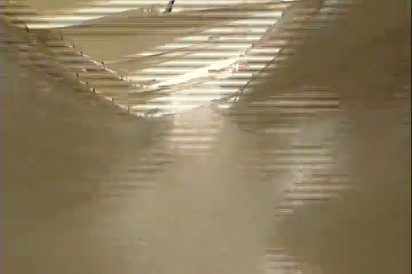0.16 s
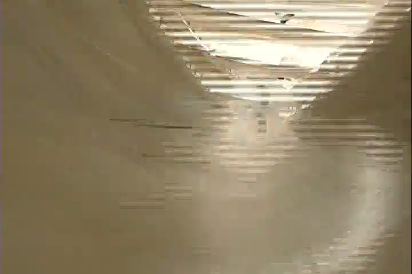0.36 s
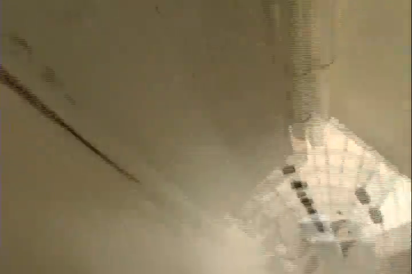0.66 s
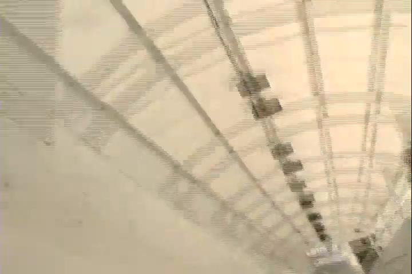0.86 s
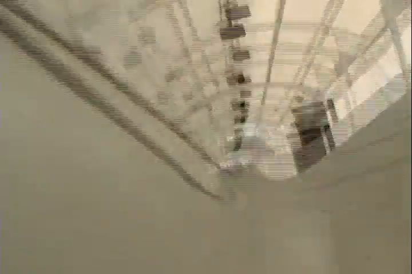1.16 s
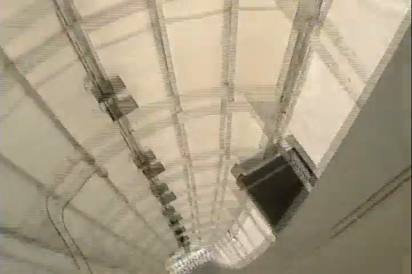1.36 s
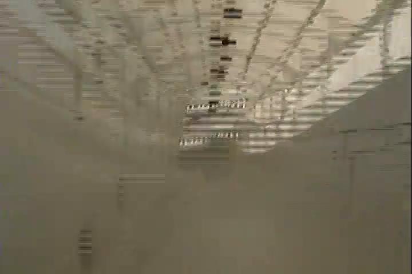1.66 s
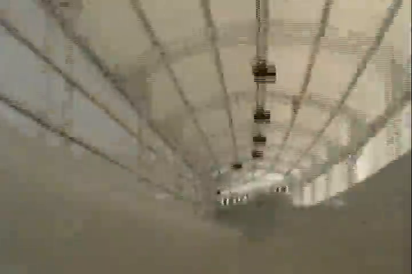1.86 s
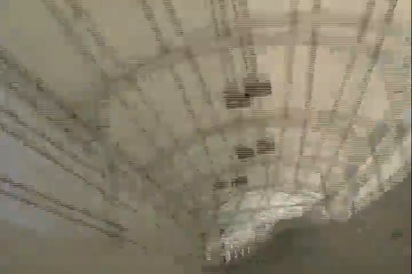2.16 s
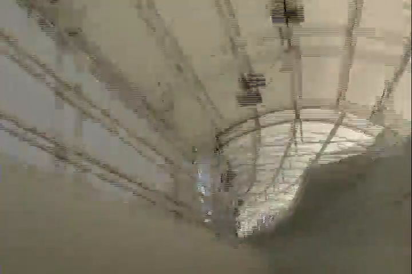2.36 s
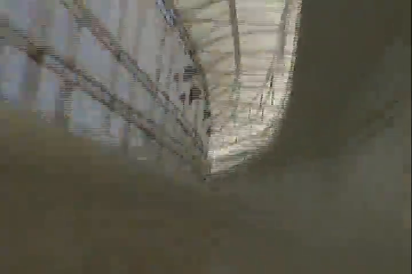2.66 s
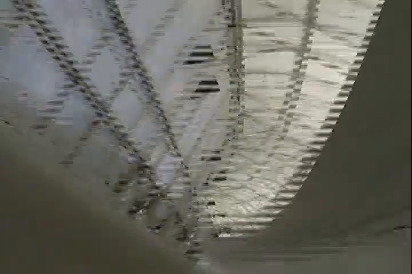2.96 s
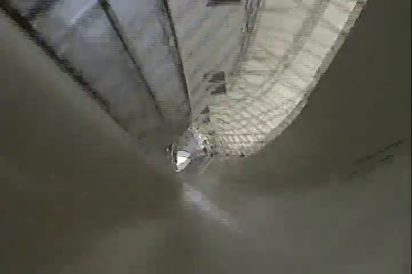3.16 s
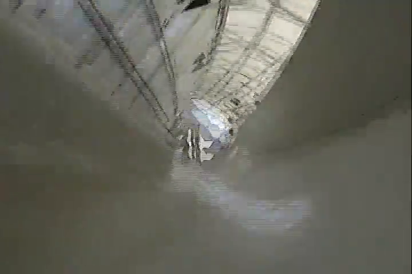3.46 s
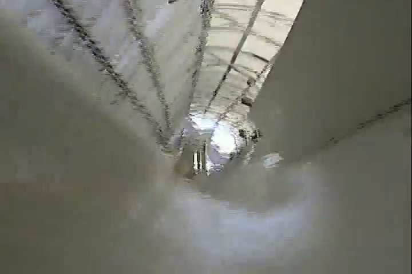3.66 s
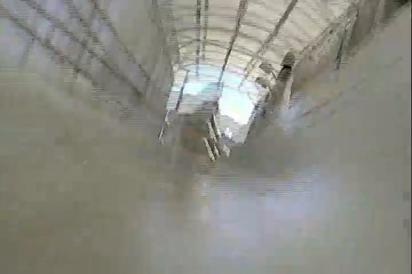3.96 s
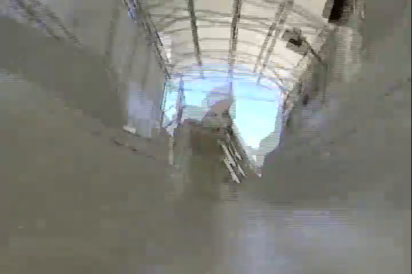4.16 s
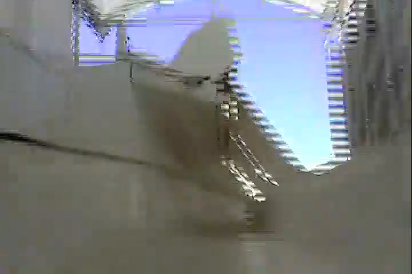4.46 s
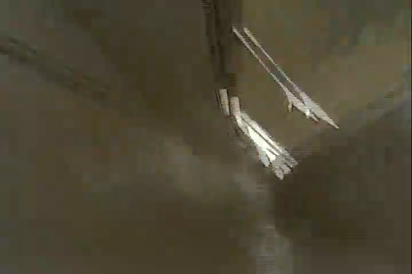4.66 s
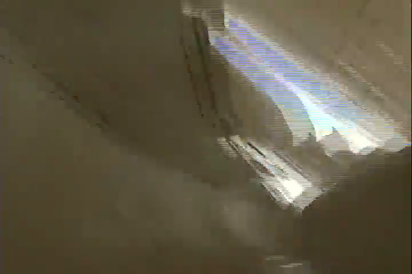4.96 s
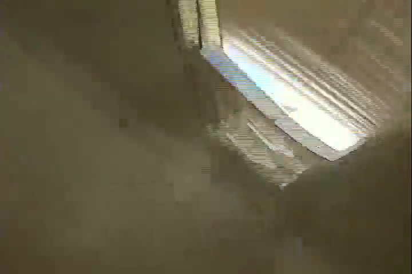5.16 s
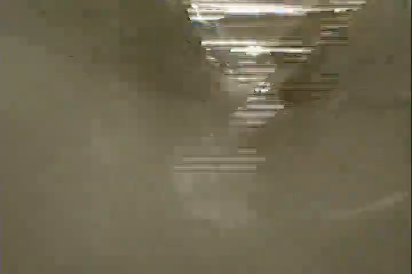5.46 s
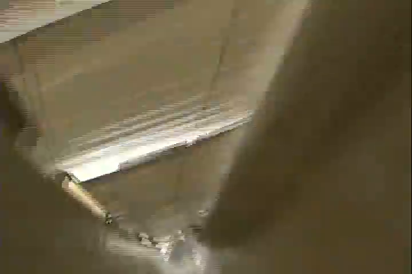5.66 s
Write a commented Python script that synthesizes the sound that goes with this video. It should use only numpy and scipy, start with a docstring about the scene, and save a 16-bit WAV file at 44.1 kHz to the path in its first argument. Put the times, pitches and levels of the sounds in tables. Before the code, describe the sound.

A sled races down a covered ice track for about six seconds, heard close and dry from a microphone on board. Throughout, steel runners roar and hiss, the shell drums with a low rumble, and gusts of wind buffet the microphone. Small crunches of chipped ice are scattered along the way. The runners skid at about 0.8 seconds, followed by a thump near 1 second. From 1.2 to 1.4 seconds the sled grinds along the wall with a growl, a steely ring and a spray of ice. Between 2 and 3.3 seconds the rumble grows heavier, with quick skids and hard, rattling bumps, strongest around 2.3, 2.6 and 2.8 seconds. More skids come between 3.6 and 4.6 seconds, with jolts near 4, 4.6 and 4.8 seconds. A last thump at 5.5 seconds is followed by brief icy crunches as the ride continues. The loudest peaks distort slightly.

```python
"""A sled races down a covered ice track, heard close and dry from a camera microphone on board.
Ripples and bumps in the ice drum on its shell, harder under load in the bends. Just below, steel
runners roar, hiss and skid, chipping the ice here and there, and once the sled grinds along the wall.
Wind buffets the microphone, and the loudest moments overload the input stage."""
import sys
import numpy as np
from scipy import signal
from scipy.fft import rfft, irfft
from scipy.io import wavfile

SR = 44100
rng = np.random.default_rng(int(sys.argv[2]) if len(sys.argv) > 2 else 0)


def generate_wav(signal):
    """Clip the signal to [-1, 1] and save it as 16-bit WAV at the path in sys.argv[1]."""
    frames = np.transpose(np.atleast_2d(signal))
    scaled = np.clip(frames, -1, 1) * 32767
    pcm = np.round(scaled).astype(np.int16)
    wavfile.write(sys.argv[1], SR, pcm)


N = 256650
T = np.arange(N) / SR
FREQS = np.maximum(np.fft.rfftfreq(N, 1 / SR), 1)


def undb(db):
    """Decibels to gain."""
    return 10 ** (np.asarray(db) / 20)


def unit(x):
    """Scale to rms 1."""
    return x / np.sqrt(np.mean(x ** 2))


def curve(rows):
    """(time, value) points joined by straight lines."""
    return np.interp(T, *np.transpose(rows))


def across(points):
    """(frequency, value) points joined on a log-frequency axis."""
    hz, value = np.transpose(points)
    return np.interp(np.log(FREQS), np.log(hz), value)


def spectrum(points):
    """Gain at every frequency from (frequency [Hz], level [dB]) points."""
    return undb(across(points))


def resonances(modes):
    """Response of damped modes; neighbours swing in opposite senses."""
    return sum((-1) ** k * undb(db) / (1 + 1j * (FREQS ** 2 - hz ** 2) / (FREQS * width))
               for k, (hz, width, db) in enumerate(modes))


def colour(x, response):
    """Filter a signal and bring it to rms 1."""
    return unit(irfft(rfft(x) * response, N))


def wander(rate):
    """Smooth random drift of rms 1 that changes about rate times a second."""
    return colour(rng.standard_normal(N), np.exp(-(FREQS / rate) ** 2))


def grains(rate, spread_db):
    """Two unrelated streams of tiny, uneven impacts, each about rate a second."""
    struck = rng.random((2, N)) < rate / SR
    size = undb(spread_db * np.minimum(rng.exponential(size=(2, N)), 5))
    return unit(struck * size * rng.choice([-1, 1], (2, N)))


def swell(start, length):
    """A push that peaks at half its length and dies away."""
    age = np.maximum(T - start, 0) / length
    return 2 * age * np.exp(1 - 2 * age)


def arch(start, length):
    """A push that builds and eases off evenly."""
    return np.sin(np.pi * np.clip((T - start) / length, 0, 1))


# side minus mid; long waves reach both ports alike: (frequency [Hz], level [dB])
MIC_WIDTH = [(25, -20), (60, -24), (130, -21), (220, -15), (500, -11.5), (900, -9.5), (1400, -6.5),
             (1900, -2.5), (2700, -3.5), (3600, -5), (4100, -1), (5000, -2), (6200, -3), (8000, -.5)]
# lag of the left port as sound bends round the camera: (frequency [Hz], phase [rad])
LEFT_LAG = [(60, 0), (300, .13), (1600, .12), (2100, 1.1), (2700, 2.1), (3100, 2), (3600, 3.1), (4400, .5),
            (5300, .2), (5700, -2.1), (7000, -2.3)]

def microphone(pair, response, width=spectrum(MIC_WIDTH), lean=1):
    """Two unrelated signals become the common and the differing part at the microphone's two ports."""
    mid, side = pair
    side = irfft(rfft(side) * width, N)
    left = np.sqrt(lean) * np.exp(-.5j * across(LEFT_LAG))
    port_responses = response * np.array([left, 1 / left]) / np.sqrt(1 + width ** 2)
    return colour(np.array([mid + side, mid - side]), port_responses)


# wind right on the microphone: (frequency [Hz], relative level [dB])
WIND_SPECTRUM = [(12, 5), (25, 4.5), (60, -29), (150, 7.5), (400, -6), (1200, -23), (3000, -48)]

def wind(level_db=-18.5, gust_db=4.0):
    """Eddies buffet the microphone."""
    gusts = undb(level_db + gust_db * wander(5.3))
    return gusts * microphone(rng.standard_normal((2, N)), spectrum(WIND_SPECTRUM))


# an edge bites the track close by: (time [s], relative level [dB], length [s])
EDGE_BITES = [(0.12, -29, 0.012), (0.557, -28, .018), (0.9, -36, 0.029), (1.21, -22.5, .025),
              (1.435, -23.5, 0.021), (1.668, -19.5, 0.014), (1.723, -30, 0.011), (2.295, -29, 0.017),
              (2.575, -25.5, 0.087), (2.839, -24, 0.016), (3.058, -32, .03), (3.664, -28, 0.016),
              (5.53, -27, 0.035), (5.61, -29.5, 0.096), (5.77, -27, 0.053)]
# breaking ice: (frequency [Hz], relative level [dB])
CHIP_SPECTRUM = [(400, -21), (1000, -0.5), (2400, 7), (3500, -7.5), (5600, -5.5), (7500, -13),
                 (11000, -17.5)]

def ice_chips(gain_db=-1):
    """Short crunches as a runner's edge breaks chips from the ice."""
    force = sum(undb(db + gain_db) * swell(t, length) for t, db, length in EDGE_BITES)
    return force * microphone(grains(5000, 3.0), spectrum(CHIP_SPECTRUM))


# the shell's scraped side: (frequency [Hz], bandwidth [Hz], relative level [dB])
FLANK_MODES = [(430, 127, 3), (656, 340, -0.5), (930, 230, 1), (1360, 170, -7.5)]
# the steel frame: (frequency [Hz], bandwidth [Hz], relative level [dB])
FRAME_MODES = [(1860, 100, 5.5), (2040, 87, 3), (2260, 180, 4), (2535, 87, 3.5), (2900, 270, -17),
               (4100, 120, -10), (4480, 240, -13)]
# side minus mid of the scrape at the microphone: (frequency [Hz], level [dB])
SCRAPE_WIDTH = [(400, -22), (750, -14), (1200, -3), (2400, -2), (3200, 5), (4400, 0)]

def wall_scrape(touch_s=1.208, leave_s=1.374, release_s=0.0069, growl_db=-8.8, ring_db=-12.8):
    """The sled sticks and slips along the wall: its side growls, then steel rings and throws off ice."""
    judder = undb(1.5 * wander(90))
    contact = np.exp(-np.maximum(T - leave_s, 0) / release_s) * judder
    growl_rise = np.clip((T - touch_s) / 0.057, 0, 1)
    ring_rise = np.clip((T - touch_s) / 0.094, 0, 1) ** 1.45
    width = spectrum(SCRAPE_WIDTH)
    damping = 1 / (1 + (FREQS / 1700) ** 4)
    growl = microphone(grains(3000, 1.3), resonances(FLANK_MODES) * damping, width)
    ring = microphone(grains(4000, 1.8), resonances(FRAME_MODES), width)
    spray = undb(-8) * microphone(grains(8000, 2.2), spectrum(CHIP_SPECTRUM), width)
    return contact * (growl * undb(growl_db) * growl_rise + (ring + spray) * undb(ring_db) * ring_rise)


# drag of the runners on the ice: (time [s], relative level [dB])
RUNNER_DRAG = [(0, -4), (.55, -1.5), (.76, -3.5), (.95, -1.5), (1.6, 0), (1.8, -1), (2.42, 0), (2.6, 1),
               (3.3, 1), (3.5, -0.5), (4.35, 0), (4.88, -1.1), (5.0, 0.1), (5.82, 0.8)]
# sideways skids: (time [s], length [s], level [dB])
RUNNER_SKIDS = [(0.805, 0.29, -14.5), (1.407, 0.15, -16), (1.93, 0.13, -16.5), (2.086, 0.13, -14.5),
                (2.28, 0.065, -17.5), (2.44, 0.2, -16), (2.704, .12, -18.5), (2.85, 0.091, -15.5),
                (3.043, 0.075, -16), (3.592, 0.16, -16), (3.73, .1, -20), (4.13, 0.18, -19),
                (4.36, 0.064, -20), (4.517, 0.091, -18.5)]
# roar and hiss from just below the microphone: (frequency [Hz], relative level [dB])
ROAR_SPECTRUM = [(200, -35), (400, -5.5), (600, 0.5), (800, -2), (1050, -5), (1500, -12.5), (2300, -20.5),
                 (3000, -27), (6000, -48)]
HISS_SPECTRUM = [(900, -30), (1700, -3), (2400, 2), (2850, -1.5), (3500, -2), (4100, -8), (5000, -8.5),
                 (5800, -13.5), (7200, -19), (10000, -22), (11500, -36)]
# left minus right of the runners at the microphone: (frequency [Hz], level [dB])
RUNNER_LEAN = [(300, 5), (1000, -1), (1600, 4.5), (2400, -1), (3000, 2.5), (3600, 4), (4900, 6),
               (6300, 4.5), (10000, 1.6)]

def runners(roar_db=-17.0, hiss_db=-28, skid_hiss_db=-17, chatter_db=1.3, chatter_hz=70):
    """Steel crushes the grain of the ice: roar and hiss follow the drag and swell in a skid."""
    lean = spectrum(RUNNER_LEAN)
    roar = microphone(grains(4000, 1.2), spectrum(ROAR_SPECTRUM), lean=lean)
    hiss = microphone(grains(16000, 1), spectrum(HISS_SPECTRUM), lean=lean)
    drag_db = curve(RUNNER_DRAG)
    skid = sum(undb(db) * arch(t, length) for t, length, db in RUNNER_SKIDS)
    chatter = undb(chatter_db * wander(chatter_hz))
    roar_gain = np.hypot(undb(roar_db + 0.69 * drag_db), skid) * chatter
    hiss_gain = np.hypot(undb(hiss_db + drag_db), undb(skid_hiss_db) * skid)
    return roar * roar_gain + hiss * hiss_gain


# how hard the track presses on the sled, high in the bends: (time [s], relative level [dB])
TRACK_LOAD = [(0, -15), (.45, -13), (.86, -12), (1.0, -11.5), (1.2, -8.5), (1.32, -17), (1.45, -11.5),
              (1.78, -16.5), (2.0, -8.5), (2.65, -8.5), (3.0, -11.5), (3.55, -11.5), (4.75, -13.5),
              (4.88, -7), (5.08, -13), (5.56, -12.5), (5.62, -19), (5.82, -15)]
# hard bumps in the track: (time [s], shell level [dB], panel level [dB])
TRACK_BUMPS = [(.31, -22, -19), (.5, -22, -14), (.63, -33, -27), (.975, -13, -24), (2.02, -19, -20),
               (2.26, -18, -24), (2.345, -8.5, -15), (2.44, -30, -18), (2.55, -16, -10), (2.635, -6, -20),
               (2.83, -10, -18), (3.02, -18, -18), (3.28, -18, -16.5), (3.86, -31, -16), (3.955, -7.5, -15),
               (4.21, -19, -12), (4.345, -15.5, -12), (4.595, -10, -20), (4.81, -8, -16), (4.98, -25, -15),
               (5.525, -9, -28)]
# the whole shell and its panels: (frequency [Hz], bandwidth [Hz], relative level [dB])
SHELL_MODES = [(48.6, 35.6, -7.5), (94, 51.2, -1.5), (131.3, 47.2, -0.5), (190.3, 58, -8.5)]
PANEL_MODES = [(232.4, 45.6, -2.5), (308.8, 77.5, 0.5), (367, 116, -1), (499.6, 140, -7)]

def shell(boom_gain_db=0.68, panel_gain_db=-10.0, bump_s=0.024):
    """Ripples in the ice drum on the shell right by the microphone, harder under load; bumps jolt it."""
    jolt = sum(undb(db) * swell(t, bump_s) for t, db, _ in TRACK_BUMPS)
    rattle = sum(undb(db) * swell(t, bump_s) for t, _, db in TRACK_BUMPS)
    damping = 1 / (1 + (FREQS / 800) ** 4)
    boom = microphone(grains(2500, 0.74), resonances(SHELL_MODES) * damping)
    panels = microphone(grains(1500, 1.5), resonances(PANEL_MODES) * damping)
    load_db = curve(TRACK_LOAD)
    drumming_db = panel_gain_db + 0.37 * load_db + 0.51 * curve(RUNNER_DRAG)
    return boom * (undb(load_db + boom_gain_db) + jolt) + panels * (undb(drumming_db) + rattle)


def scene():
    """The microphone rides on the sled, so everything is close and dry."""
    return wind() + ice_chips() + wall_scrape() + runners() + shell()


def record(dry):
    """The input stage flattens the peaks, and the top treble is cut."""
    ceiling, knee, top_hz = .74, 6, 11200
    flattened = dry / (1 + np.abs(dry / ceiling) ** knee) ** (1 / knee)
    lowpass = signal.ellip(10, .2, 75, top_hz, fs=SR, output="sos")
    return signal.sosfilt(lowpass, flattened)


dry = scene()
out = record(dry)
generate_wav(out)
```